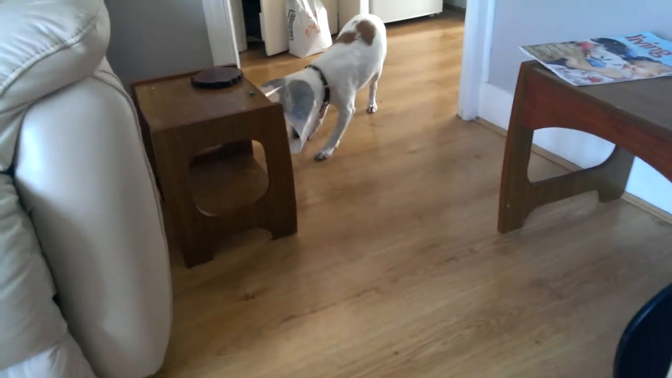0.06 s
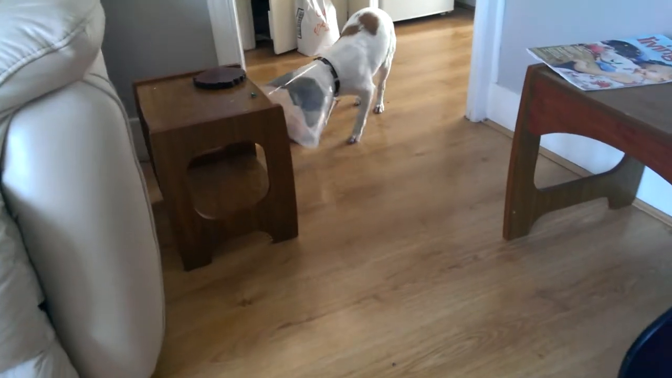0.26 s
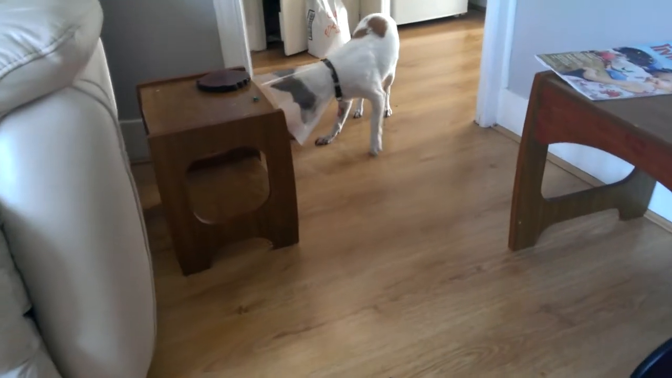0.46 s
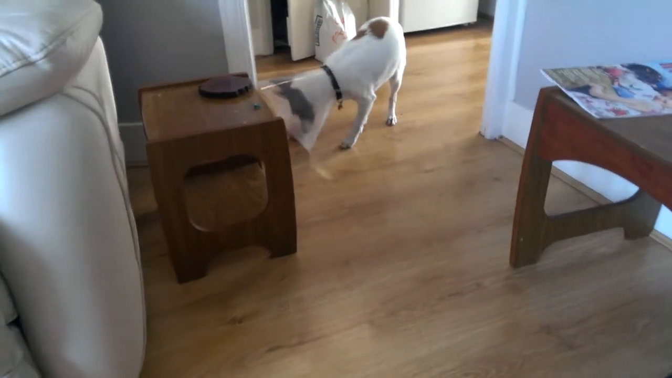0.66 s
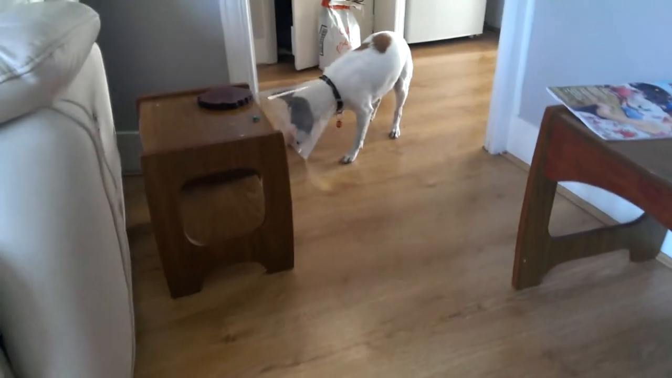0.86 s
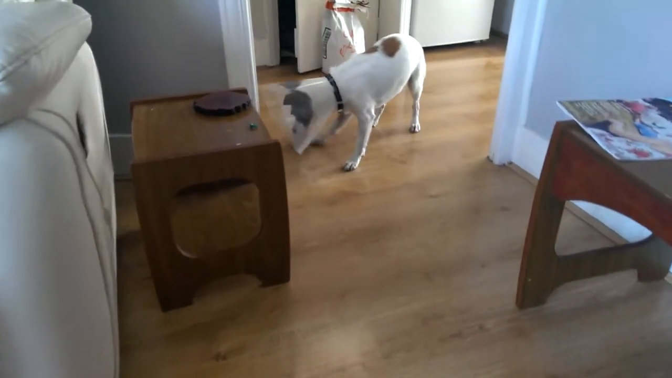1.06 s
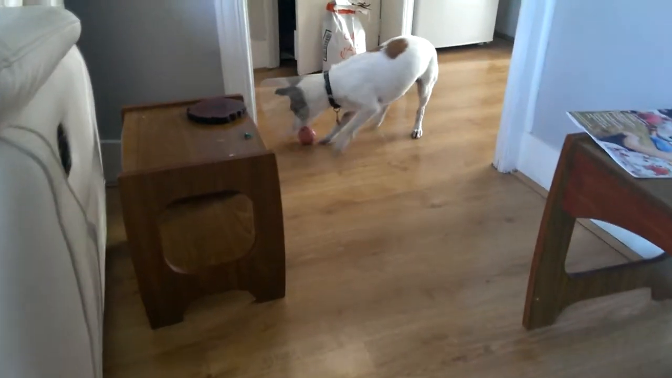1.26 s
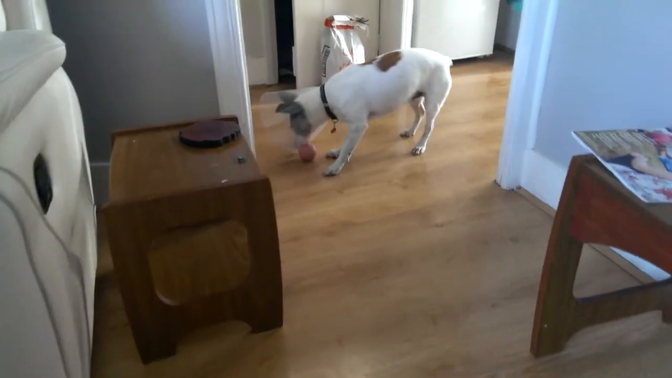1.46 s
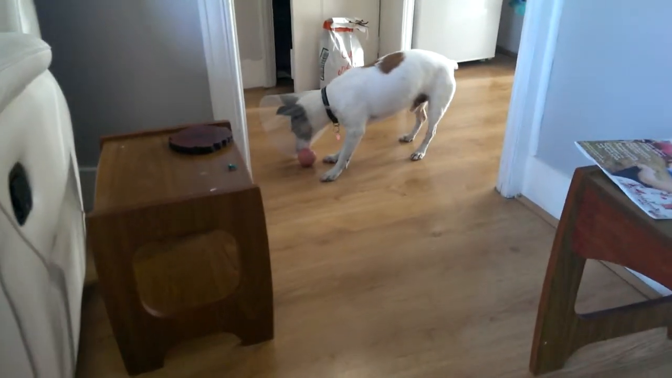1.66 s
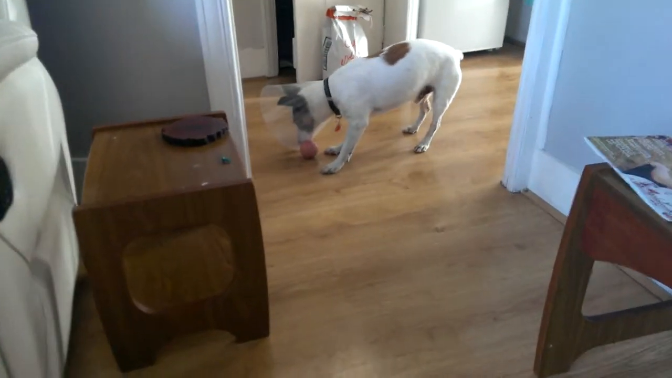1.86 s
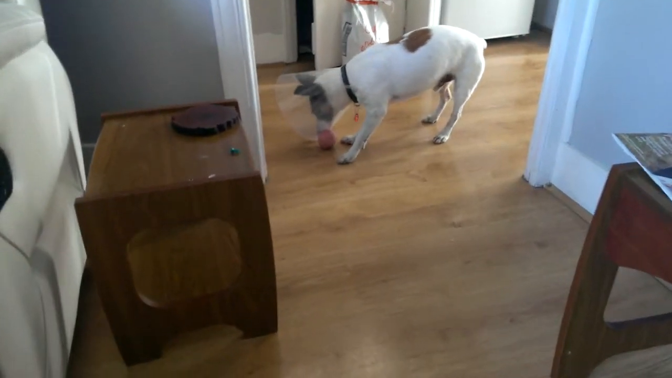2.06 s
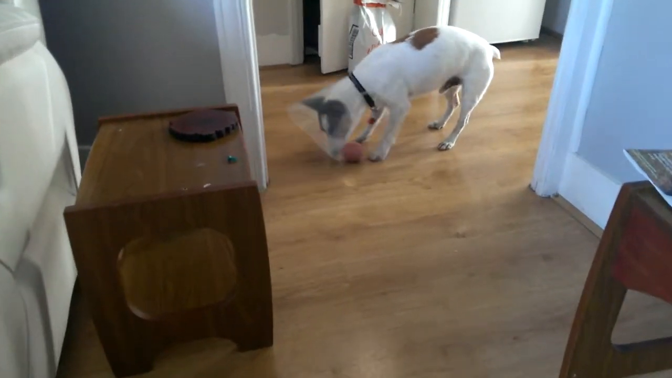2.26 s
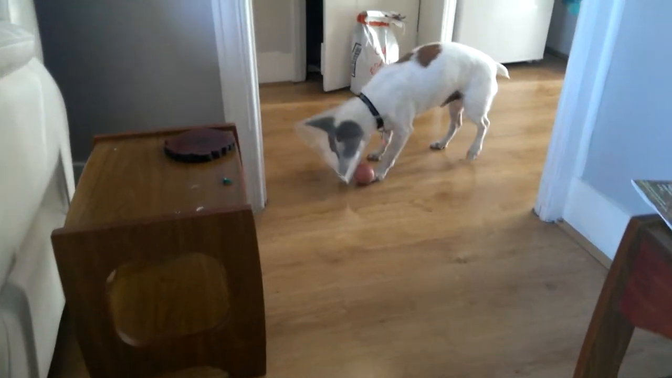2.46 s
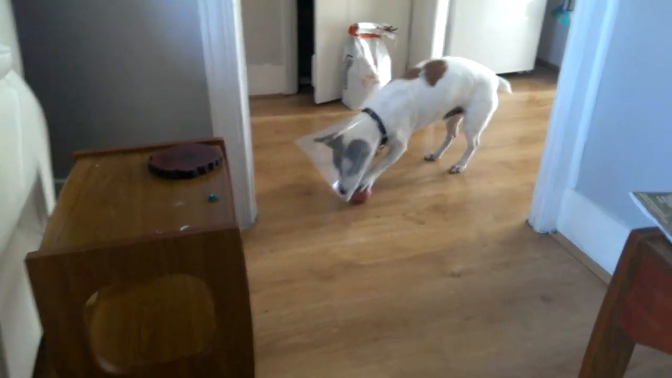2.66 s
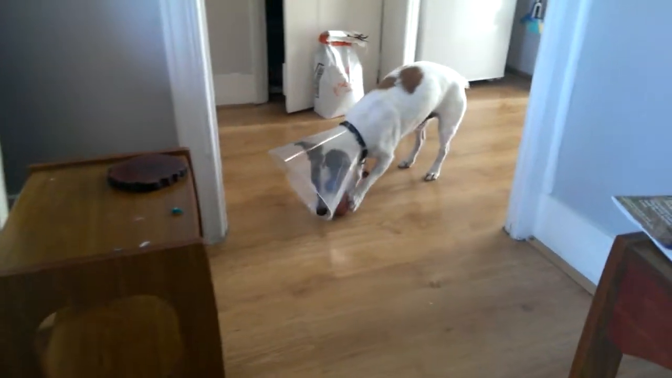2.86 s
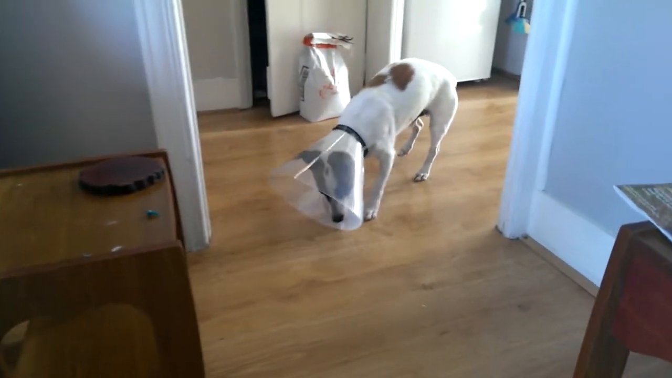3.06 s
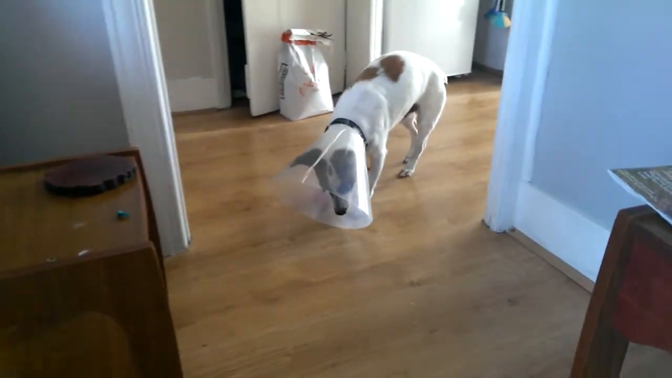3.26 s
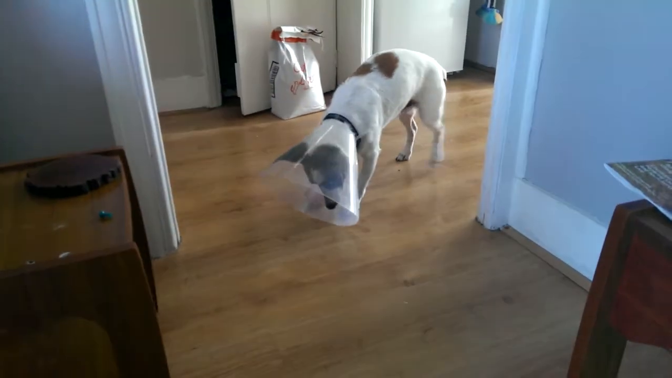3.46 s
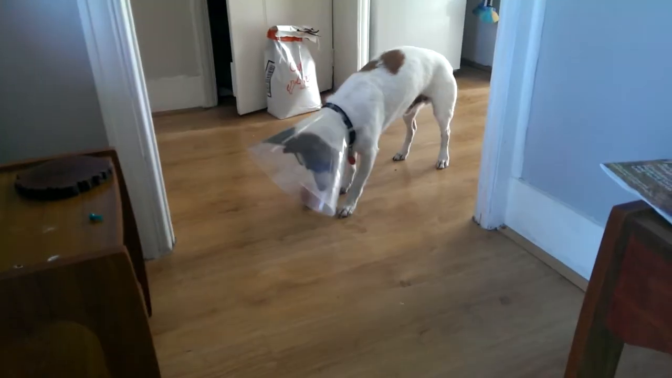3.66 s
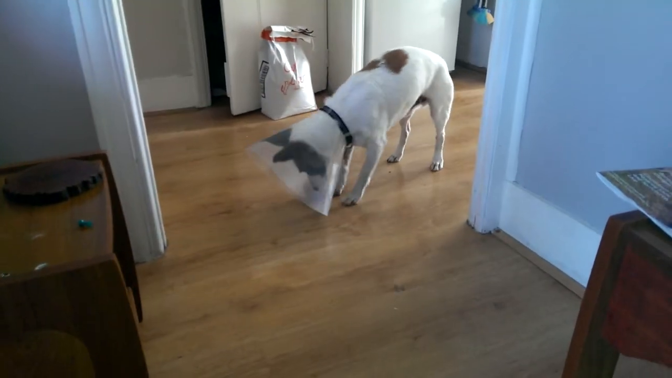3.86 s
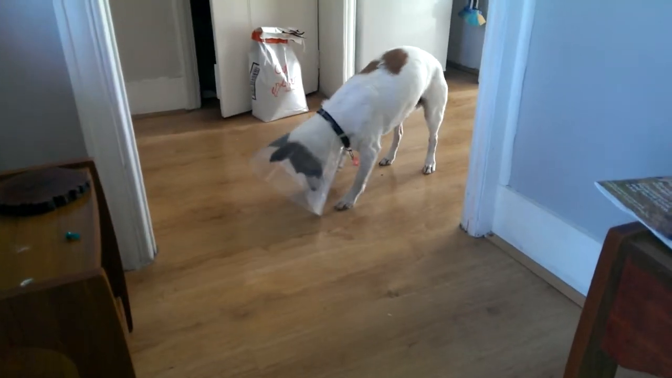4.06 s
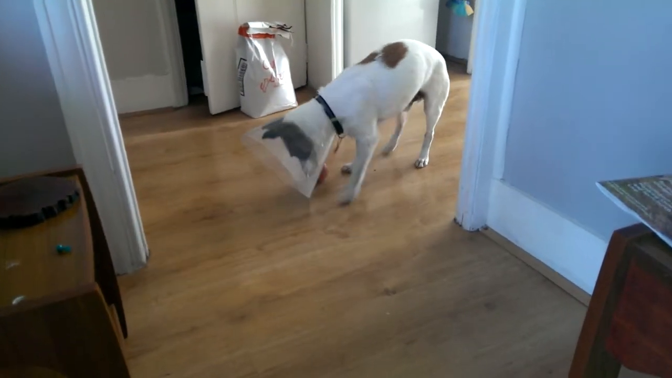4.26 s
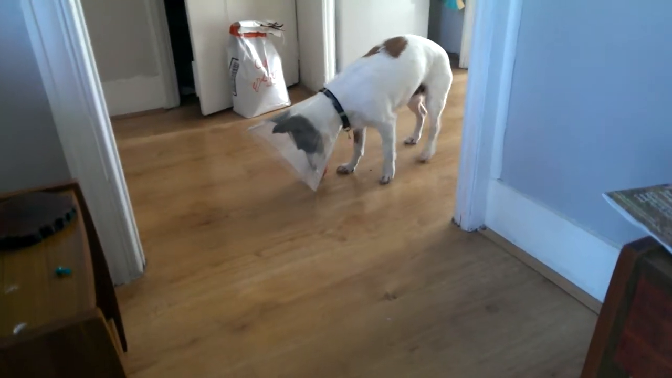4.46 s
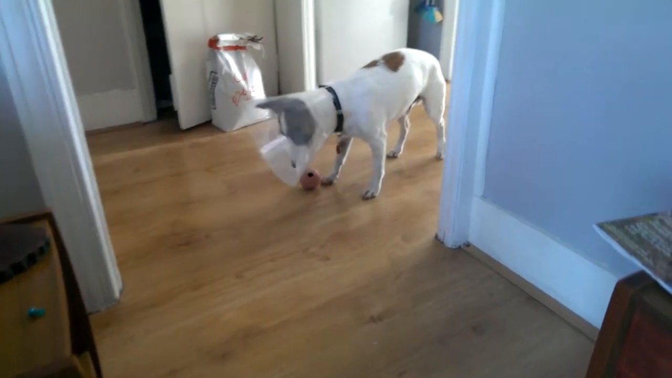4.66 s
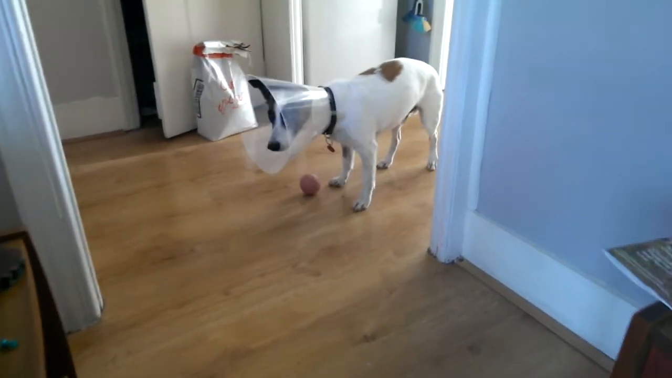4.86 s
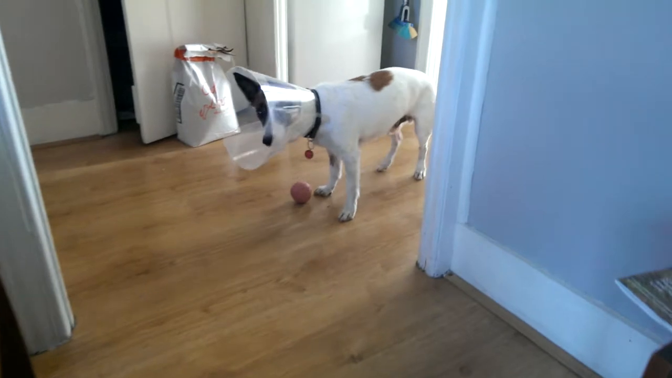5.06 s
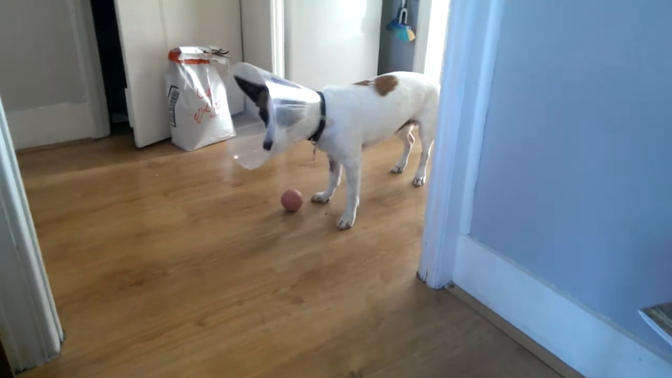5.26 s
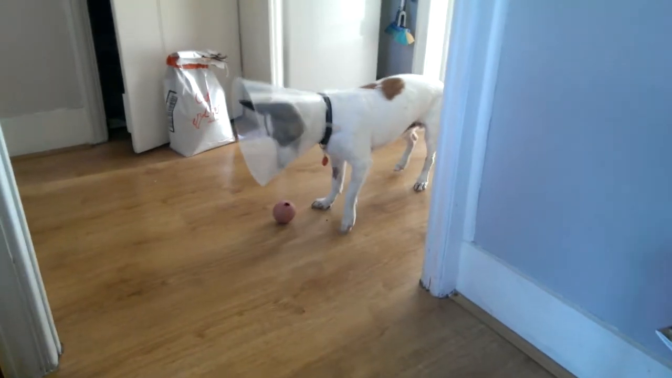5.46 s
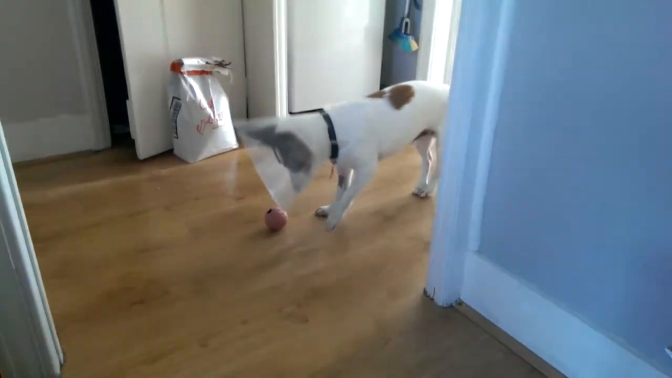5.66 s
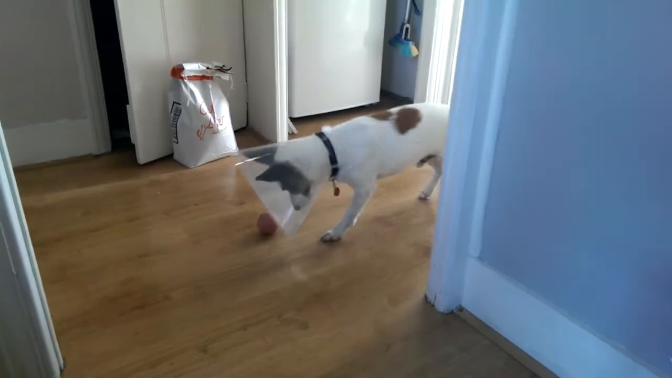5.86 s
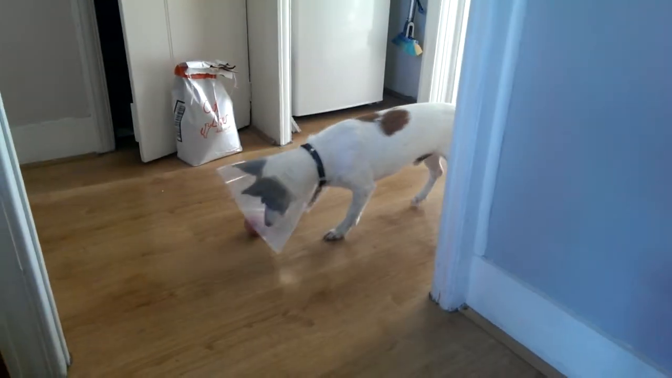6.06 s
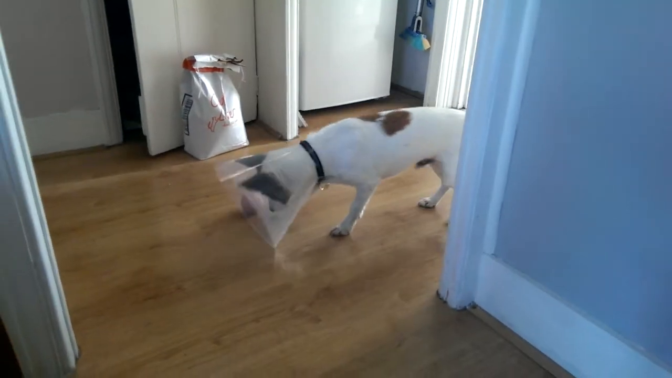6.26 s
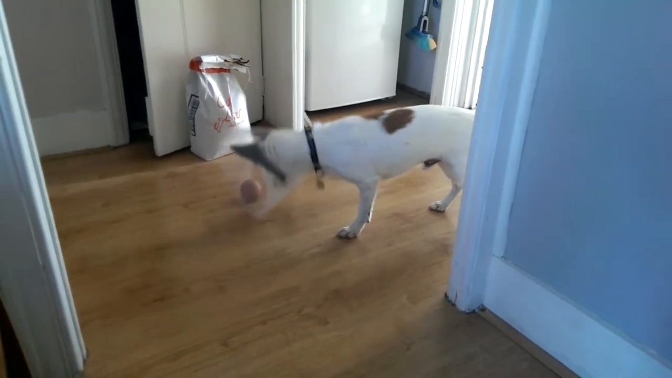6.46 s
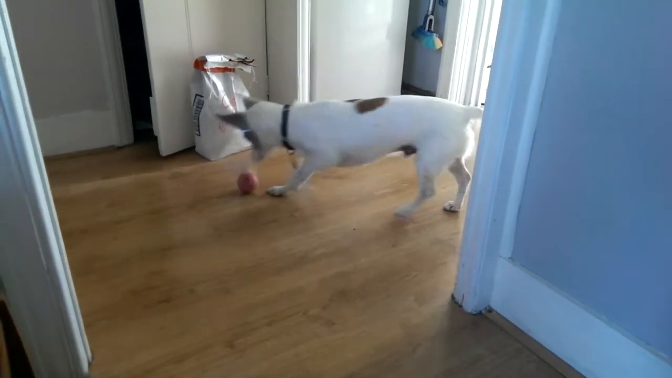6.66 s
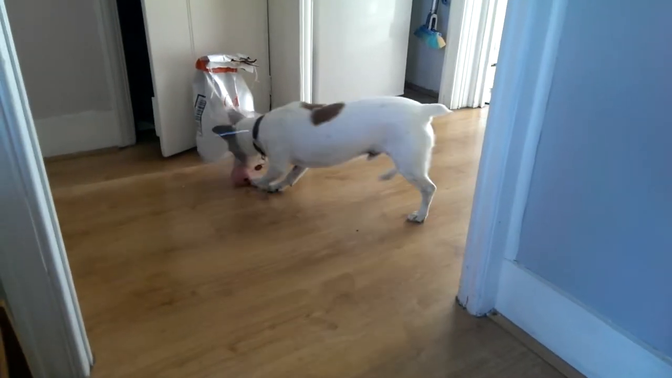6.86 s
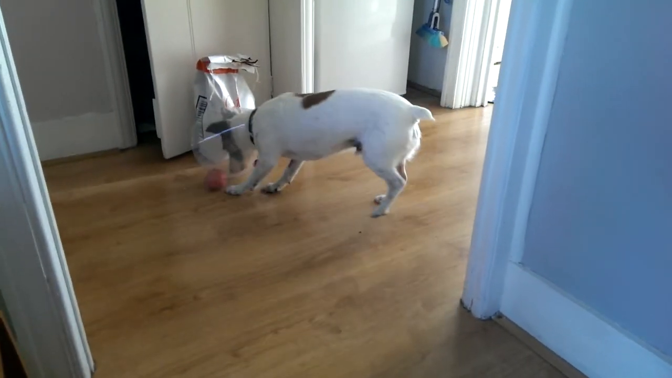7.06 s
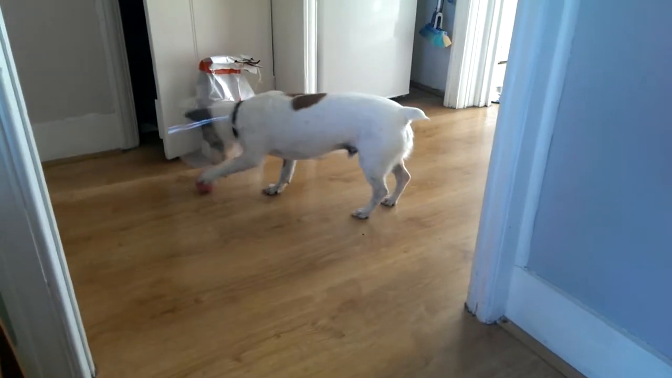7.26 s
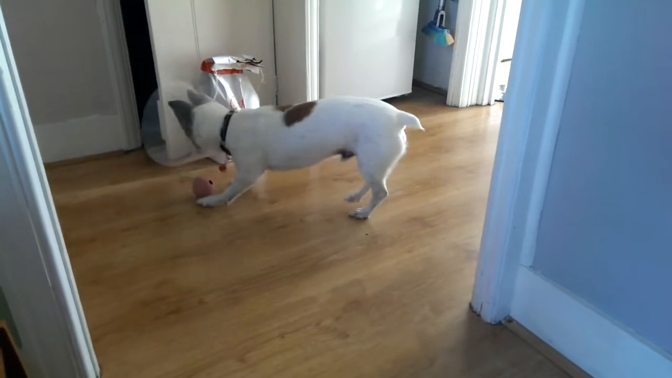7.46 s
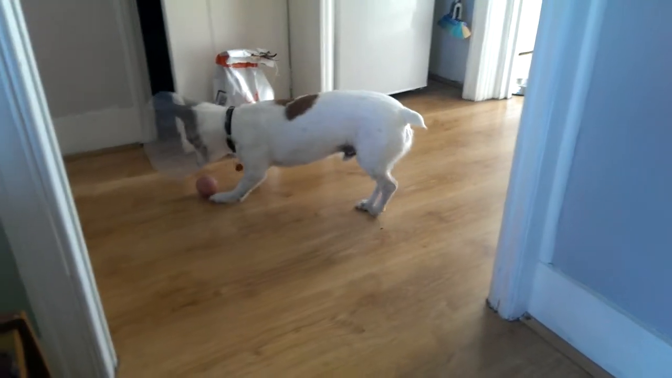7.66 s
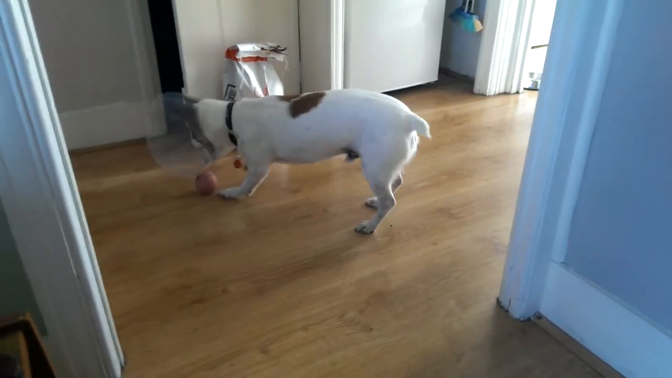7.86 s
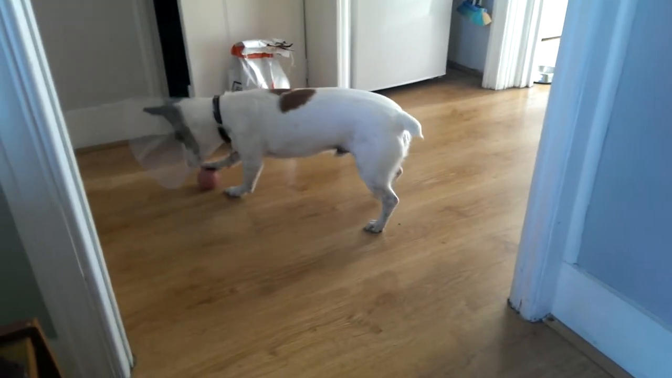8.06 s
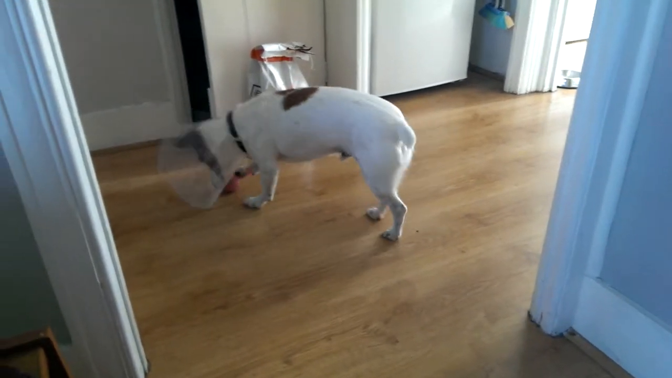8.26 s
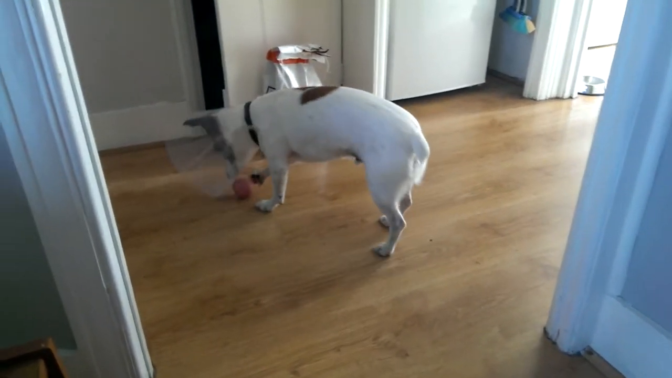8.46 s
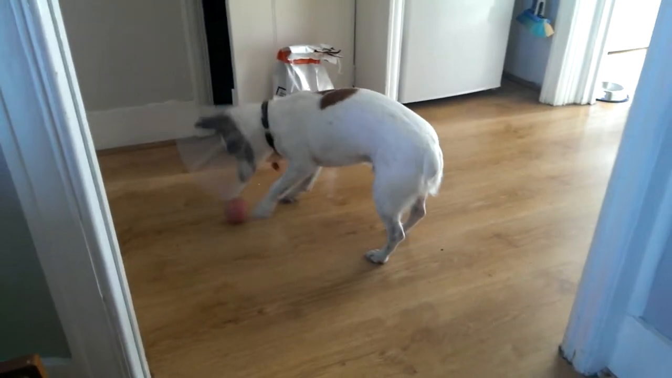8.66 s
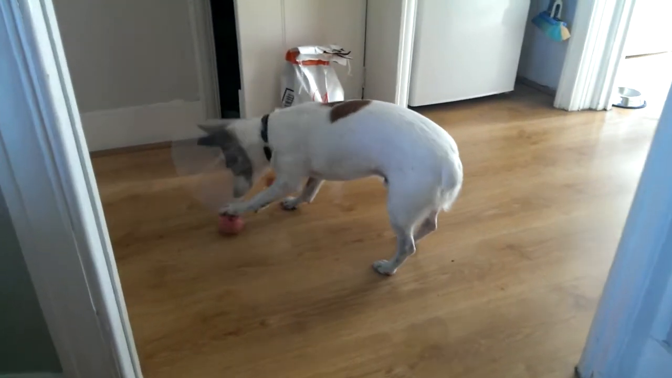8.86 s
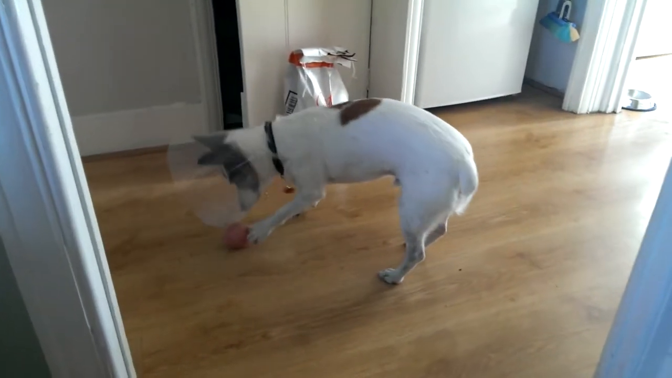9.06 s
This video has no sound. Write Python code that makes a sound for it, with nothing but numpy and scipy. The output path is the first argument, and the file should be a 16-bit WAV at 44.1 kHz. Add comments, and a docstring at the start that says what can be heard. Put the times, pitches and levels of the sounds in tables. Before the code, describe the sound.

Handheld stereo microphone a few metres from a dog on bare boards. Dry plastic ticks and a few hollow close knocks come first, then bright cone snaps with springy little rattles and brief rim scrapes. After a quieter middle, a lively burst brings loud claw ticks, soft paw thumps, scuffs and woody ball clatter, thinning to scattered ticks. Half-second room ring, faint hum and air throughout.

```python
"""Plastic ticks, snaps and scrapes on boards: a dog in a cone collar pushes a rubber ball about a wooden floor.
Shaped chatter makes rim, claws and bumps; grainy noise makes scrapes, scuffs and rolling.
Paws thump as short pushes with a noisy boom; damped sines make hollow knocks close by and the tag's tinkle.
Wavering sines squeak as rubber. A hard room rings for half a second over air, hum and rumble."""
import sys
import numpy as np
from scipy import signal
from scipy.fft import rfft, irfft, next_fast_len
from scipy.io import wavfile
from scipy.ndimage import uniform_filter1d

SR = 44100
rng = np.random.default_rng(int(sys.argv[2]) if len(sys.argv) > 2 else 0)


def put_to_file(sound):
    """Save the sound as 16-bit audio at rate SR, in the file named by the first command-line argument."""
    columns = np.atleast_2d(sound).T  # one column per channel
    safe = np.clip(columns, -1, 1)
    whole_steps = np.round(safe * 32767)
    wavfile.write(sys.argv[1], SR, whole_steps.astype(np.int16))


N = 402191

# Weight landing on the boards. Each row: start in seconds, relative level in dB.
PAW_LANDINGS = [(1.46, -40), (2.343, -39), (2.705, -35), (5.842, -38), (6.076, -41), (6.124, -34.5),
                (6.43, -31.5), (6.56, -33.5), (6.65, -25), (6.857, -29), (7.047, -26), (7.362, -24.5),
                (7.48, -23), (7.74, -37), (8.049, -35.5), (8.327, -36), (8.635, -26), (8.812, -33),
                (9.031, -40)]
# Spectrum of the plastic cone. Each row: frequency in Hz, relative gain in dB.
CONE_COLOUR = [(100, -12), (300, -23), (750, -17.5), (1050, -16.5), (1500, -13), (2400, -10), (3300, -4),
               (4100, 0), (4800, -1.5), (6300, -5), (8000, -12), (10500, -21.5), (13000, -16),
               (16000, -29.5)]
# Spectrum of the floor's boom. Each row: frequency in Hz, relative gain in dB.
BOARD_COLOUR = [(25, 12), (56, 4), (69, 17), (90, 11), (112, 12), (140, -5), (220, -7.5), (450, -31.5),
                (1500, -76)]


def amp(db):
    """Converts dB to amplitude."""
    return 10 ** (np.asarray(db) / 20)


def evened(x):
    """Scales to rms 1."""
    return x / np.sqrt(np.mean(x ** 2) + 1e-20)


def read(points, hz):
    """Interpolates (Hz, value) points on a log-frequency axis."""
    f, value = np.transpose(points)
    return np.interp(np.log(hz + 1), np.log(f + 1), value)


def clock(size):
    """Sample times in seconds."""
    return np.arange(size) / SR


def decay(t, t60):
    """Exponential decay by 60 dB in t60 seconds."""
    return np.exp(-np.log(1000) * t / t60)


def add(mix, s, sound):
    """Mixes a sound in at a time in seconds."""
    part = mix[max(round(s * SR), 0):][:len(sound)]
    part += sound[:len(part)]


def peaked(x, size):
    """Scales so that the loudest stretch of this many samples has rms 1."""
    return x / np.sqrt(uniform_filter1d(x ** 2, size, mode="constant").max())


def causal(db):
    """Minimum-phase response with these gains per rfft bin."""
    cepstrum = irfft(np.log(amp(db)))
    half = len(cepstrum) // 2
    cepstrum[1:half] *= 2
    cepstrum[half + 1:] = 0
    return irfft(np.exp(rfft(cepstrum)))


def coloured(x, points):
    """Gives a signal a spectrum, at rms 1."""
    size = next_fast_len(len(x))
    gain = amp(read(points, np.fft.rfftfreq(size, 1 / SR)))
    return evened(irfft(rfft(x, size) * gain, size)[:len(x)])


def diffuse(pair):
    """Two unrelated signals become a diffuse field: alike in the bass, unrelated in the treble."""
    # Likeness of the two microphones. Each row: frequency in Hz, correlation.
    likeness = [(600, 0.66), (1100, -0.04)]
    size = next_fast_len(pair.shape[1])
    a, b = rfft(pair, size)
    same = np.clip(read(likeness, np.fft.rfftfreq(size, 1 / SR)), -1, 1)
    mid, side = a * np.sqrt((1 + same) / 2), b * np.sqrt((1 - same) / 2)
    return irfft(np.array([mid + side, mid - side]), size)[:, :pair.shape[1]]


def room_tail(gap_s, build_s):
    """Dense reflections that build up, then die band by band."""
    # Reverberation. Each row: frequency in Hz, t60 in seconds.
    room_t60 = [(150, 0.38), (2000, 0.64), (4200, 0.56), (9000, 0.46)]
    taps = rng.standard_normal((2, 30000)) * (rng.random((2, 30000)) < .2)
    hz, t, z = signal.stft(diffuse(taps), SR, nperseg=256)
    z *= decay(t, read(room_t60, hz)[:, None])
    tail = signal.istft(z, SR)[1]
    tail *= 1 - np.exp(-np.maximum(clock(tail.shape[1]) - gap_s, 0) / build_s)
    return tail / np.linalg.norm(tail, axis=1, keepdims=True)


def placed(x, tails, left_db, right_db, scatter_db, wet_db):
    """Direct sound plus echoes that crossfade through a fixed cycle of random early scatters and room tails."""
    step_s, scatter_s = .3, .005  # time per echo pattern, decay constant of the scatter
    out, t = np.zeros((2, N)), clock(tails[0].shape[1])
    for k, tail in enumerate(tails):
        steps_away = (clock(N) / step_s - k + 1) % len(tails) - 1
        fade = np.cos(np.pi / 2 * np.minimum(abs(steps_away), 1))
        early = diffuse(rng.standard_normal(tail.shape)) * np.exp(-t / scatter_s)
        early /= np.linalg.norm(early, axis=1, keepdims=True)
        echoes = amp(wet_db) * tail + amp(scatter_db) * early
        out += signal.oaconvolve((x * fade)[None], echoes, axes=1)[:, :N]
    direct = np.array([amp(left_db) * x, amp(right_db) * np.roll(x, 4)])  # right is 4 samples late
    return out + direct


def chatter(chatter_s, grit, ring_db, ring_stretch):
    """A contact builds, lets go in a few uneven slips and rings on; it drives all frequencies alike."""
    build_share = .15  # of the chatter time
    t = clock(size=2048)
    force, sizes = rng.standard_normal((2, len(t)))
    slips = evened(np.exp(grit * evened(uniform_filter1d(sizes, size=40))))
    ring = amp(ring_db) * np.exp(-t / (ring_stretch * chatter_s))
    shape = np.hypot(slips * np.exp(-t / chatter_s), ring)
    shape *= 1 - np.exp(-t / (build_share * chatter_s))
    force = force * shape
    for _ in range(8):  # alternate between flat spectrum and wanted envelope
        spectrum = rfft(force, 2 * len(t))
        flat = irfft(spectrum / abs(spectrum))[:len(t)]
        force = shape * flat / np.sqrt(abs(uniform_filter1d(flat ** 2, size=40)) + 1e-20)
    return force


def clicks(rows, colour, grit, ring_db, ring_stretch):
    """Each contact's chatter takes the colour of the struck part."""
    sheet_peak_db, sheet_width_hz = 5.5, 250
    out, hz = np.zeros(N), np.fft.rfftfreq(1024, 1 / SR)
    body = read([(1800, 0.65), (3500, 0.18)], hz)
    edge = read([(6500, 0.16), (9500, 0.83)], hz)
    for s, db, body_db, edge_db, chatter_s, *sheet_hz in rows:
        # only the cone's rows carry a sheet resonance
        sheet_db = sum(sheet_peak_db / (1 + (2 * (hz - f) / sheet_width_hz) ** 2) for f in sheet_hz)
        part = causal(read(colour, hz) + body_db * body + edge_db * edge + sheet_db)
        force = chatter(chatter_s, grit, ring_db, ring_stretch)
        add(out, s, amp(db) * peaked(signal.fftconvolve(force, part), size=130))
    return out


def strokes(rows, colour, grains_per_s, grain_db, smooth, judder_db):
    """Friction: tiny catches of uneven size over smooth noise, swelling, fading and juddering per stroke."""
    swell_share = 0.55  # of the stroke's length
    t = clock(N)
    power = np.zeros(N)
    for s, length_s, db in rows:
        near = slice(*np.searchsorted(t, [s - 3 * length_s, s + 3 * length_s]))
        u = (t[near] - s) / length_s
        share = np.where(u < 0, swell_share, 1 - swell_share)
        power[near] += amp(db) ** 2 * np.exp(-(u / share) ** 2)
    sizes = amp(grain_db * np.minimum(rng.exponential(1, N), 4))
    catches = (rng.random(N) < grains_per_s / SR) * rng.choice([-1, 1], N) * sizes
    wander = evened(uniform_filter1d(rng.standard_normal(N), size=300))
    judder = evened(amp(judder_db * wander))
    friction = coloured(evened(catches) + smooth * rng.standard_normal(N), colour)
    return np.sqrt(power) * judder * friction


def background(waver):
    """Still room air, the wavering hum of an appliance and a low rumble that comes and goes."""
    # Spectrum of the air. Each row: frequency in Hz, relative gain in dB.
    air_colour = [(20, -22), (45, -0.5), (70, -5.5), (100, -8.5), (140, -10.5), (250, -17.5), (550, -14),
                  (900, -19), (1900, -15), (3500, -22.5), (7000, -28.5), (16000, -31)]
    # Levels of the hum's first harmonics in dB.
    harmonic_db = [-69, -87, -82]
    # Rumble before doubling. Each row: time in seconds, level in dB.
    rumble_levels = [(0, -68.5), (1, -64.5), (2, -79.5), (4.75, -65.5), (5.3, -70.5)]
    air_db, hum_hz = -63.5, 102.1
    t = clock(N)
    air = diffuse(np.array([coloured(z, air_colour) for z in rng.standard_normal((2, N))]))
    drift = waver * coloured(rng.standard_normal(N), [(3, 0), (12, -30), (40, -120)])
    phase = 2 * np.pi * hum_hz * t + drift
    hum = sum(amp(db) * evened((1 + drift) * np.sin(k * phase)) for k, db in enumerate(harmonic_db, 1))
    rumble_db = np.interp(t, *np.transpose(rumble_levels))
    rumble = amp(rumble_db) * coloured(rng.standard_normal(N), BOARD_COLOUR)
    return amp(air_db) * air + hum + 2 * rumble


def knocks(contact_s):
    """Blunt blows on a small hollow body; its pitch depends on where it is hit."""
    # Knocks close by. Each row: start in seconds, relative level in dB, pitch factor.
    knock_rows = [(0.5905, -22, 0.99), (.747, -35.5, 1.05), (.778, -32.5, 1.27), (0.783, -24.5, 1.06),
                  (1.005, -45, 1.05)]
    # Modes of the body. Each row: frequency in Hz at pitch factor 1, relative level in dB, t60 in seconds.
    body_modes = [(239, -15, 0.1), (380, 3.5, 0.02), (467, 6.5, 0.028), (435.4, -14, 0.21),
                  (780, -19, 0.066), (1390, 15, 0.0035)]
    out, t = np.zeros(N), clock(size=14000)
    no_bass = signal.butter(2, 170, "high", fs=SR, output="sos")
    onset = 1 - np.exp(-(t / contact_s) ** 2)
    for s, db, pitch in knock_rows:
        modes = sum(amp(mode_db) * decay(t, t60) * np.sin(2 * np.pi * pitch * hz * t)
                    for hz, mode_db, t60 in body_modes)
        add(out, s, amp(db) * peaked(signal.sosfilt(no_bass, modes * onset), size=180))
    return out


def tag(t60, split_hz, onset_s):
    """The collar tag, a small metal disc, rings with a close pair of modes."""
    # Tinkles. Each row: start in seconds, relative level in dB.
    tinkle_rows = [(6.905, -38), (7.293, -50)]
    tag_hz = 12200
    out, t = np.zeros(N), clock(size=12000)
    pair = np.sin(2 * np.pi * tag_hz * t) + .5 * np.sin(2 * np.pi * (tag_hz + split_hz) * t)
    ring = pair * (1 - np.exp(-t / onset_s)) * decay(t, t60)
    for s, db in tinkle_rows:
        add(out, s, amp(db) * ring)
    return out


def squeaks(sag, waver):
    """The rubber ball sticks and slips on the floor, unsteadily and falling in pitch."""
    # Squeaks. Each row: start in seconds, relative level in dB, pitch it falls to in Hz, time scale in seconds.
    squeak_rows = [(3.781, -65.5, 1463, .055), (6.849, -40, 880, 0.0062), (7.036, -49, 972, 0.009),
                   (8.035, -49, 950, 0.0096)]
    out, t = np.zeros(N), clock(size=8000)
    for s, db, hz, length_s in squeak_rows:
        u = t / length_s
        wander = evened(uniform_filter1d(rng.standard_normal(len(t)), size=120))
        pitch_hz = hz * (1 + sag * np.exp(-u ** 2) + waver * wander)
        tone = np.sin(2 * np.pi * np.cumsum(pitch_hz) / SR)
        add(out, s, amp(db) * peaked(u ** 2 * np.exp(-u ** 2) * tone, size=180))
    return out


def ball_rolls():
    """The ball rolls over the boards as sparse, dull catches."""
    # Rolls. Each row: time of the maximum in seconds, length scale in seconds, relative level in dB.
    roll_rows = [(2.805, 0.01, -38), (3.93, 0.14, -57), (4.88, 0.46, -57.5), (7.46, 0.099, -45)]
    # Spectrum of rolling. Each row: frequency in Hz, relative gain in dB.
    roll_colour = [(60, -31.5), (200, -5.5), (600, -0.5), (1500, -6), (4000, -12), (16000, -57)]
    return strokes(roll_rows, roll_colour, grains_per_s=440, grain_db=5.5, smooth=1.0, judder_db=5.5)


def bumps(length_s, skirt_db):
    """Ball and paws make the loose boards clatter in one broad, heavily damped resonance."""
    # Bumps. Each row: start in seconds, relative level in dB, centre frequency in Hz.
    bump_rows = [(1.364, -42.5, 900), (2.347, -40, 466), (2.69, -45, 680), (3.938, -48.5, 467),
                 (6.799, -37, 800), (7.386, -36, 344), (7.437, -26.5, 490), (7.46, -34.5, 514),
                 (8.802, -44, 1080), (8.837, -49, 800)]
    out, hz = np.zeros(N), np.fft.rfftfreq(2048, 1 / SR)
    for s, db, centre_hz in bump_rows:
        octaves = np.log2((hz + 20) / centre_hz)
        board = causal(-skirt_db * np.hypot(octaves, .5))
        clatter = chatter(length_s, grit=.5, ring_db=-20, ring_stretch=2)
        add(out, s, amp(db) * peaked(signal.fftconvolve(clatter, board), size=260))
    return out


def thumps(push_hz, push_s, boom_db, boom_t60):
    """A soft pad pushes the boards through a cycle or two; floor and room then rumble unevenly."""
    low_cut_hz = 57.7
    out, t = np.zeros(N), clock(size=24000)
    fade = (1 - np.exp(-t / push_s)) * decay(t, boom_t60)
    load = (t / push_s) ** 2 * np.exp(-t / push_s)
    push = peaked(load * np.sin(2 * np.pi * push_hz * t), size=500)
    for s, db in PAW_LANDINGS:
        boom = peaked(coloured(rng.standard_normal(len(t)), BOARD_COLOUR) * fade, size=2000)
        add(out, s, amp(db) * peaked(push + amp(boom_db) * boom, size=500))
    return signal.sosfiltfilt(signal.butter(3, low_cut_hz, "high", fs=SR, output="sos"), out)


def pad_scuffs(length_s, grip, db):
    """Every paw slides a little as it lands, louder under more weight."""
    return [(s, length_s, db + grip * weight_db) for s, weight_db in PAW_LANDINGS]


def floor_scuffs():
    """Paws and ball drag on the floor, and pads slide as they land."""
    # Drags. Each row: time of the maximum in seconds, length scale in seconds, relative level in dB.
    drag_rows = [(.78, 0.018, -31), (2.30, 0.13, -54), (2.635, 0.055, -53), (4.09, 0.13, -55.5),
                 (7.25, 0.4, -56.5), (7.392, 0.049, -43), (7.444, 0.013, -30), (7.48, .047, -44.5),
                 (8.345, 0.12, -54.5), (8.85, 0.063, -53.5)]
    # Spectrum of scuffing. Each row: frequency in Hz, relative gain in dB.
    scuff_colour = [(60, -8), (200, -6.5), (520, 3.5), (800, -3.5), (1500, 3), (2500, 0), (5000, -3),
                    (9000, -16.5), (16000, -20.5)]
    rows = [*drag_rows, *pad_scuffs(length_s=0.066, grip=0.56, db=-40.5)]
    return strokes(rows, scuff_colour, grains_per_s=1400, grain_db=0.5, smooth=0.58, judder_db=5.5)


def claw_ticks(tick_s, edge_db):
    """Claws tick on the boards: the more pad lands too, the fuller, duller and longer the tick."""
    # Ticks. Each row: start in seconds, relative level in dB, weight of the body below the treble in dB.
    claw_rows = [(2.683, -27.5, 10), (6.306, -17, 2), (6.58, -21, -0.5), (6.8, -11, -2), (7.436, -13.5, 2),
                 (8.012, -24.5, 11.5), (8.0147, -30.5, -10.5), (8.2397, -26.5, -10), (8.321, -26, 0.5),
                 (8.609, -30, -2), (8.854, -26.5, 3.5), (8.994, -23, 2)]
    # Spectrum of a claw. Each row: frequency in Hz, relative gain in dB.
    claw_colour = [(100, 2), (300, -11.5), (900, 0.5), (5000, -2.5), (13000, -5.5), (16000, -6)]
    rows = [(s, db, body_db, edge_db - body_db, tick_s * amp(body_db)) for s, db, body_db in claw_rows]
    return clicks(rows, claw_colour, grit=0.34, ring_db=-11.0, ring_stretch=1.8)


def plastic_ticks(length_s, grain):
    """One slip of the sheet: a few grainy cycles that swell and stop."""
    # Dry ticks. Each row: start in seconds, relative level in dB.
    tick_rows = [(0.1567, -33.5), (0.2788, -31.5), (0.4094, -38), (.433, -30), (1.4708, -25.5),
                 (1.478, -36), (5.7513, -47)]
    tick_hz = 5430
    out, t = np.zeros(N), clock(size=512)
    u = t / length_s
    for s, db in tick_rows:
        noise = coloured(rng.standard_normal(len(t)), CONE_COLOUR)
        cycles = np.sin(2 * np.pi * tick_hz * t) + grain * noise
        add(out, s, amp(db) * peaked(u ** 2 * np.exp(-u ** 2) * cycles, size=130))
    return out


def rim_scrapes():
    """The cone's rim slides on the boards as a stream of catches."""
    # Slides. Each row: time of the maximum in seconds, length scale in seconds, relative level in dB.
    scrape_rows = [(.02, 0.2, -59.5), (.265, 0.078, -47.5), (.45, 0.082, -51), (.58, 0.023, -52.5),
                   (.72, 0.071, -48.5), (1.348, 0.031, -48), (2.175, 0.024, -60), (2.32, 0.044, -51.5),
                   (2.628, 0.024, -52.5), (2.70, 0.0061, -40.5), (3.135, 0.028, -47), (3.88, 0.021, -53.5),
                   (4.363, .019, -45.5), (4.83, 0.2, -58), (7.025, 0.069, -50), (7.495, 0.035, -43),
                   (7.75, 0.027, -53), (8.733, 0.017, -50)]
    return strokes(scrape_rows, CONE_COLOUR, grains_per_s=900, grain_db=1.5, smooth=1.0, judder_db=1.5)


def rim_contacts(body_db):
    """A light touch is one short tick; a hard-pressed rim chatters longer as it lets go."""
    # Snaps. Each row: start in seconds, relative level in dB, treble edge in dB, ring of the bent sheet in Hz.
    snap_rows = [(0.286, -28, -21, 3980), (0.6864, -19, -18.5, 5900), (1.1434, -22.5, -15, 3870),
                 (1.3634, -14.5, -19, 3970), (1.371, -22, -18, 4630), (2.346, -16, -16, 4100),
                 (2.353, -27, -22, 5070), (2.793, -16.5, -20.5, 4040), (3.024, -30, -16, 6800),
                 (3.2745, -31, -19, 4350), (3.4071, -23, -35, 4350), (3.5924, -30.5, -17, 4140),
                 (3.923, -25, -21, 5100), (4.192, -25.5, -46, 4750), (4.2228, -26, -38, 3580),
                 (4.4565, -29.5, -15, 4100), (4.5193, -19, -32, 3880), (4.5421, -30, -33, 3880),
                 (4.6746, -33, -14, 4330), (5.795, -20, -13.5, 4390), (6.148, -16.5, -24, 4900),
                 (6.3607, -15.5, -22, 3620), (6.7145, -12, -14.5, 4240), (6.8625, -17.5, -10, 5030),
                 (7.526, -29.5, -17, 5550)]
    longest_s, half_length_db, plain_edge_db = 0.0042, -29, -19  # plain edge: cone colour as it stands
    return [(s, db, body_db, edge_db - plain_edge_db, longest_s / (1 + amp(half_length_db - db) ** 2), hz)
            for s, db, edge_db, hz in snap_rows]


def rattles(snaps, delay_s, below_db, spread_db, detune):
    """After each snap the springy cone skips three more times, weaker and bent a little differently."""
    rows = []
    for s, db, body_db, edge_db, chatter_s, sheet_hz in snaps:
        for k, (wait, size, bend) in enumerate(rng.random((3, 3)), 1):
            skip_s = s + (k - .5 + wait) * delay_s
            skip_db = db - below_db - k * spread_db * size
            skip_hz = sheet_hz * (1 + detune * (bend - .5))
            rows.append((skip_s, skip_db, body_db, edge_db, chatter_s / 2, skip_hz))
    return rows


def rim_snaps():
    """The cone's rim snaps on the floor and rattles after each snap."""
    contacts = rim_contacts(body_db=1.0)
    skips = rattles(contacts, delay_s=0.025, below_db=14.5, spread_db=14, detune=0.36)
    return clicks(contacts + skips, CONE_COLOUR, grit=0.49, ring_db=-19.5, ring_stretch=5.9)


def scene():
    """Sounds lean left; cone and claws have little direct sound on the right, knocks, feet and bumps plenty."""
    tails = [room_tail(gap_s=0.004, build_s=0.0015) * amp([[.8], [-.8]]) for _ in range(6)]
    close = placed(knocks(contact_s=.0018), tails, left_db=0, right_db=-1, scatter_db=-22, wet_db=-6)

    tinkle = tag(t60=.1, split_hz=70, onset_s=.003)
    rubber = squeaks(sag=0.1, waver=.09)
    low_sources = amp(-2.0) * floor_scuffs() + amp(-8.5) * ball_rolls() + rubber + tinkle
    feet = placed(low_sources, tails, left_db=2, right_db=-3.0, scatter_db=-2.0, wet_db=2.0)

    wood = bumps(length_s=0.009, skirt_db=14.5)
    bumping = placed(wood, tails, left_db=-1.5, right_db=-4.5, scatter_db=-9.5, wet_db=-6.5)
    boards = thumps(push_hz=98.5, push_s=.0055, boom_db=1.0, boom_t60=0.53)
    boards = amp(-5.5) * boards * amp([[.5], [-.5]])

    claws = amp(-14.5) * claw_ticks(tick_s=0.00087, edge_db=-9)
    ticks = placed(claws, tails, left_db=-1.0, right_db=-17, scatter_db=-3, wet_db=-2)
    slips = plastic_ticks(length_s=.001, grain=.8)
    plastic = placed(slips, tails, left_db=1, right_db=-12, scatter_db=-8, wet_db=-6)
    rim = amp(-8.0) * rim_snaps() + rim_scrapes()
    cone = placed(rim, tails, left_db=3.0, right_db=-93.0, scatter_db=0.5, wet_db=2.0)
    return background(waver=0.22) + close + feet + bumping + boards + ticks + plastic + cone


def record(dry):
    """The recorder's low cut and band limit."""
    low_cut_hz, edge_hz = 51.5, 16300
    dry = signal.sosfilt(signal.butter(3, low_cut_hz, "high", fs=SR, output="sos"), dry)
    band_limit = signal.firwin(401, edge_hz, window=("kaiser", 9), fs=SR)
    return signal.oaconvolve(dry, band_limit[None], "same")


dry = scene()
out = record(dry)
put_to_file(out)
```